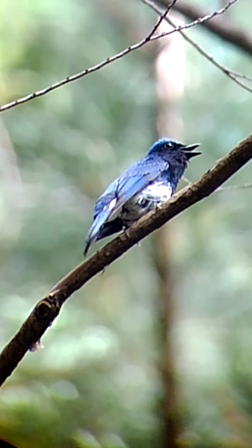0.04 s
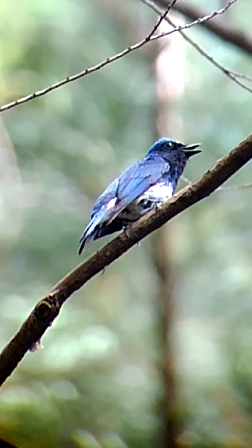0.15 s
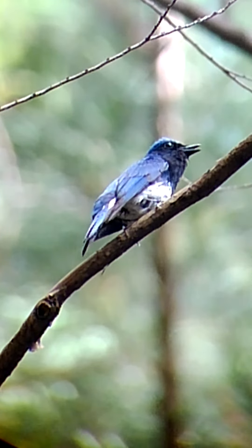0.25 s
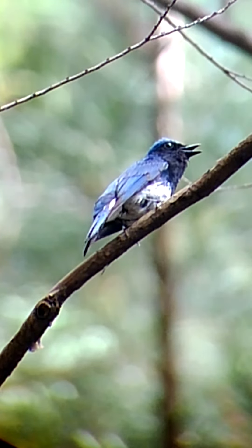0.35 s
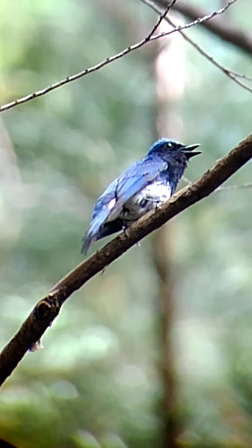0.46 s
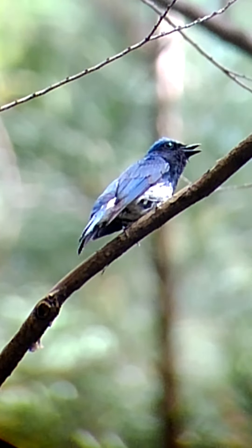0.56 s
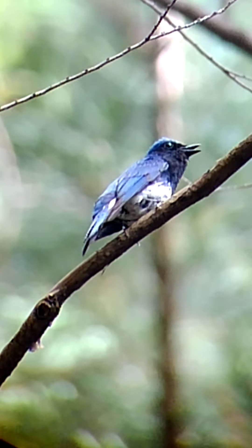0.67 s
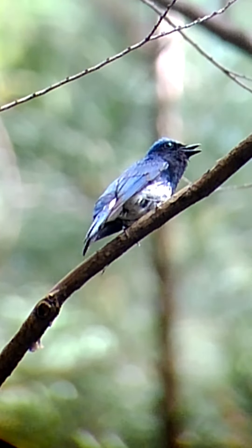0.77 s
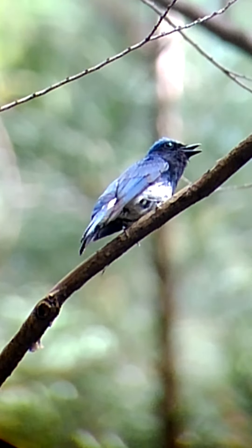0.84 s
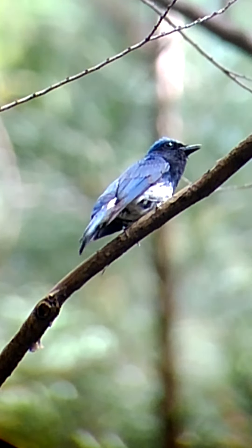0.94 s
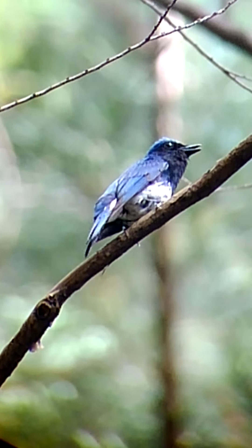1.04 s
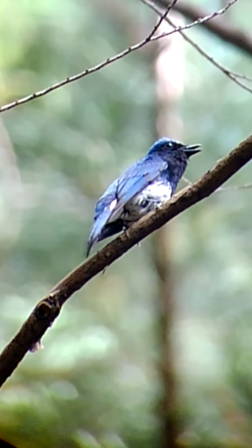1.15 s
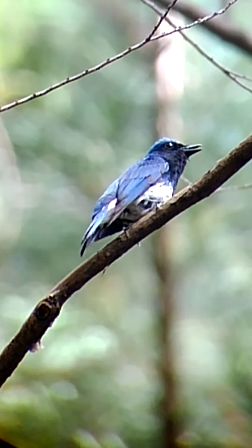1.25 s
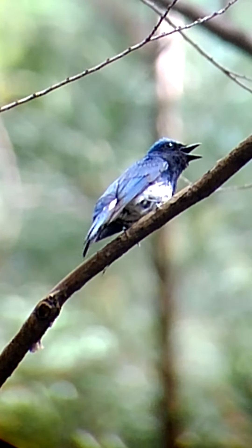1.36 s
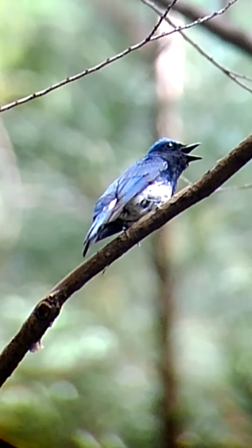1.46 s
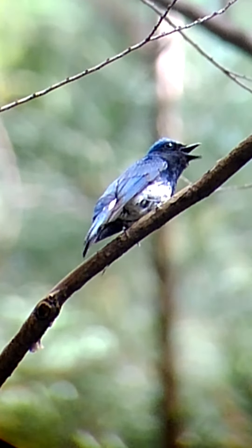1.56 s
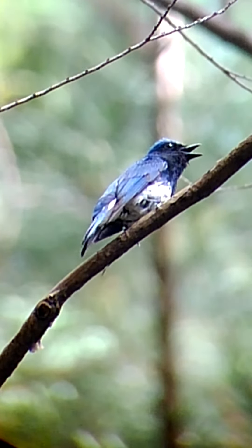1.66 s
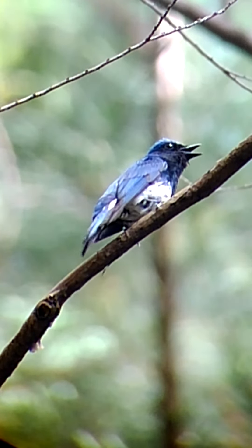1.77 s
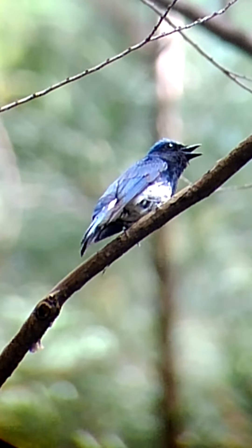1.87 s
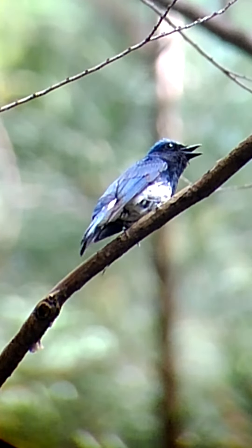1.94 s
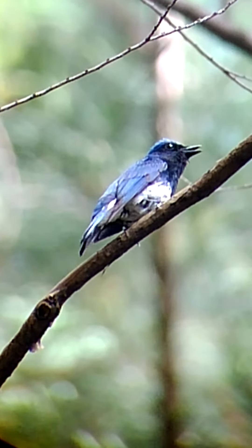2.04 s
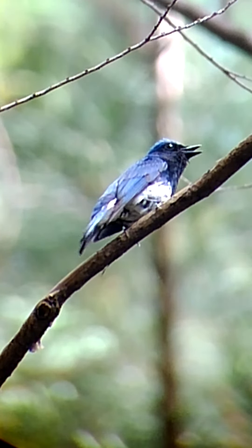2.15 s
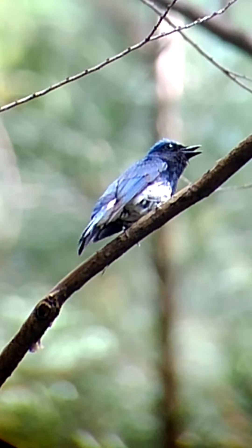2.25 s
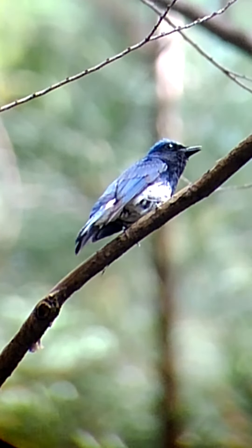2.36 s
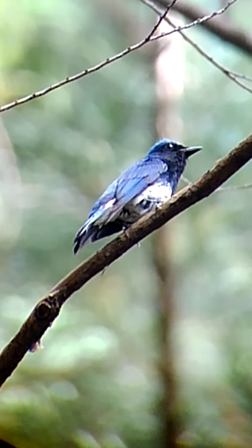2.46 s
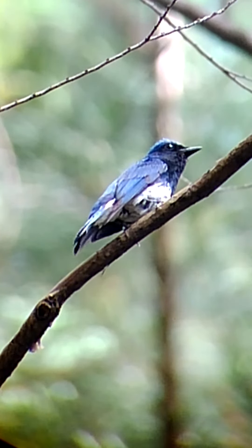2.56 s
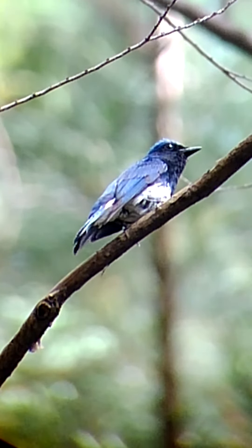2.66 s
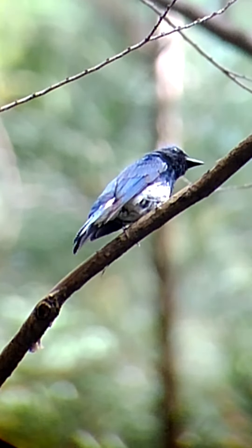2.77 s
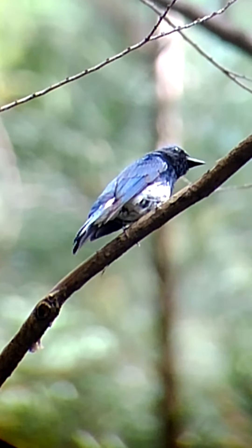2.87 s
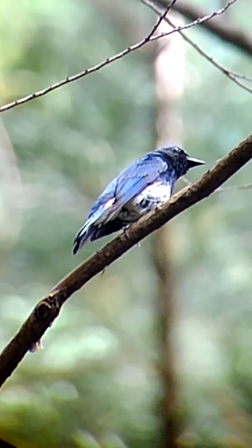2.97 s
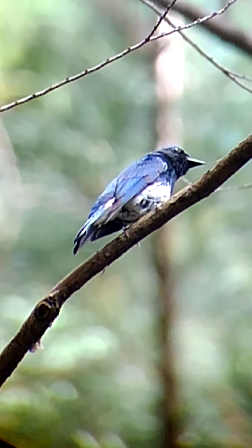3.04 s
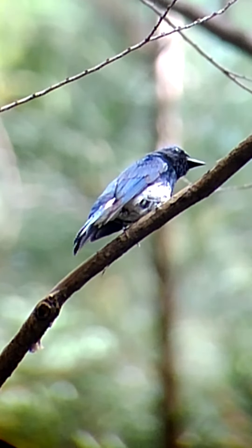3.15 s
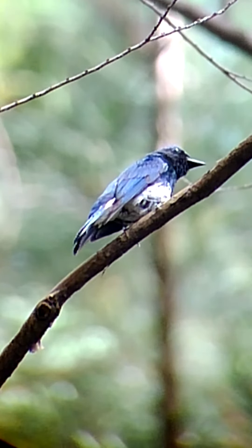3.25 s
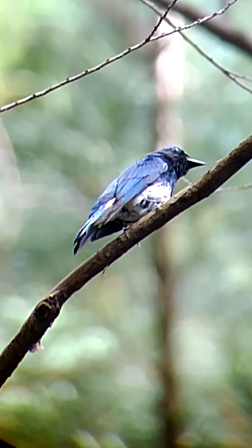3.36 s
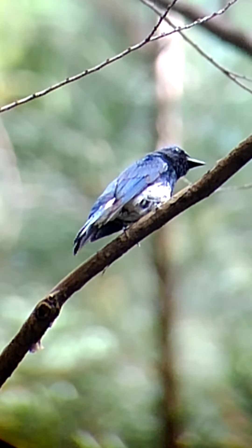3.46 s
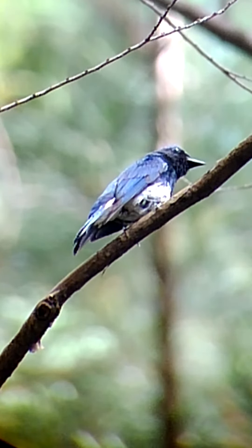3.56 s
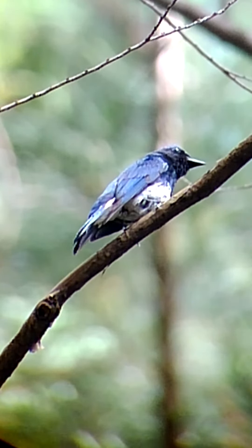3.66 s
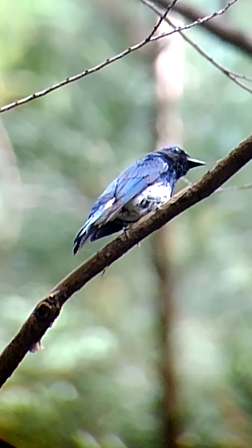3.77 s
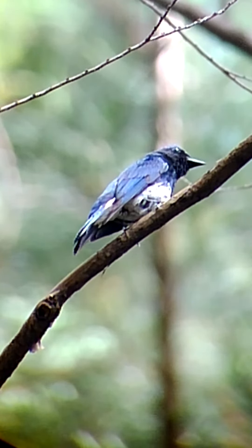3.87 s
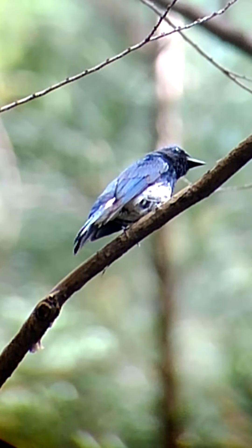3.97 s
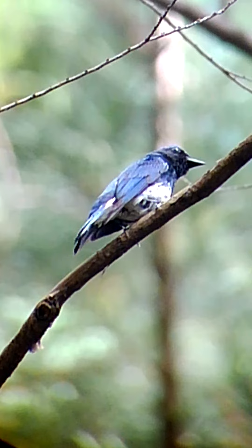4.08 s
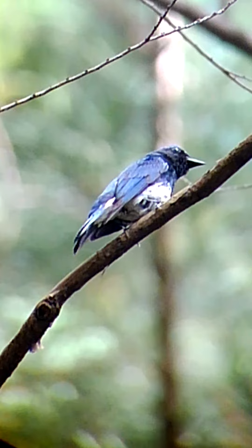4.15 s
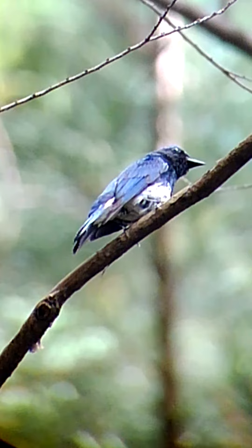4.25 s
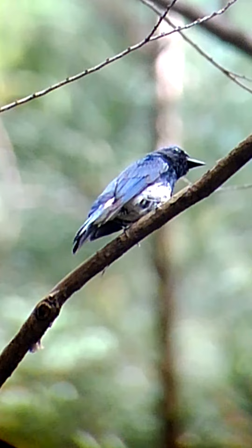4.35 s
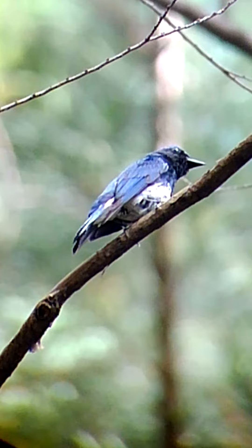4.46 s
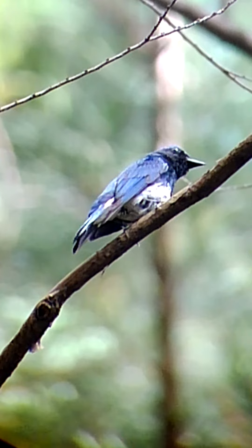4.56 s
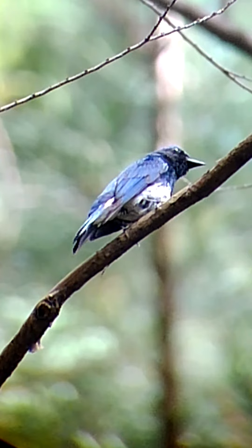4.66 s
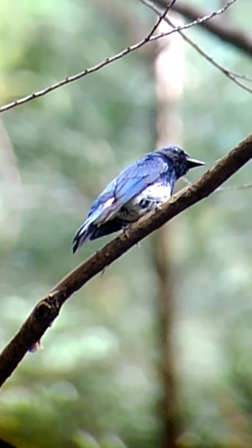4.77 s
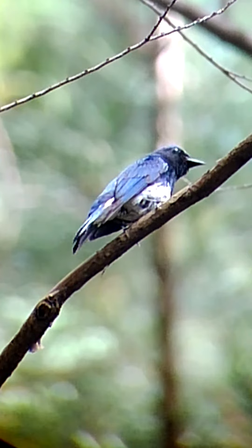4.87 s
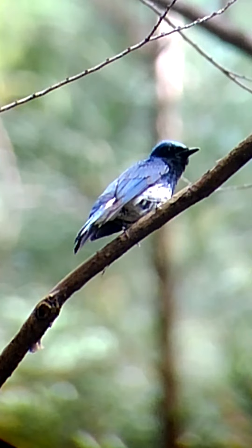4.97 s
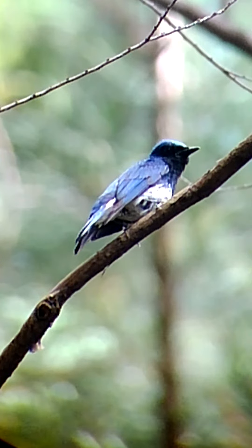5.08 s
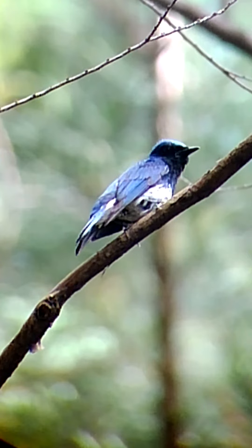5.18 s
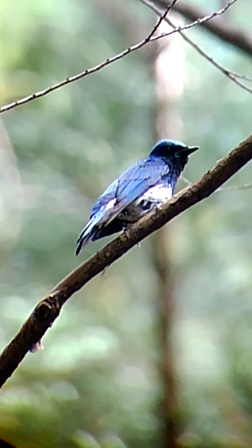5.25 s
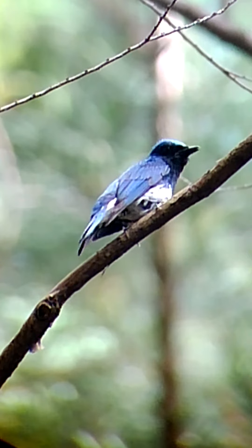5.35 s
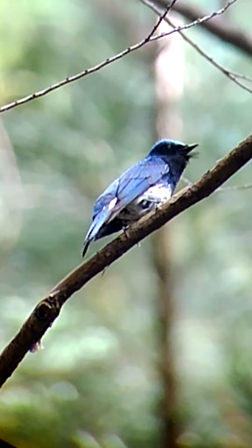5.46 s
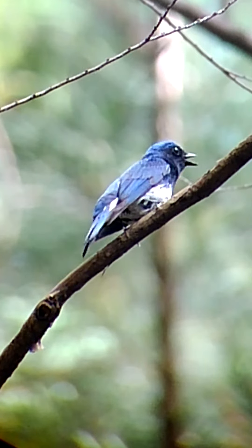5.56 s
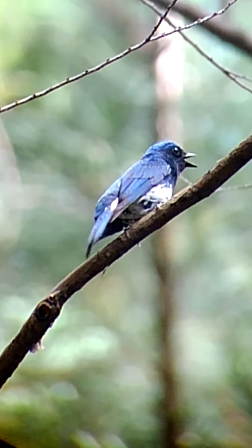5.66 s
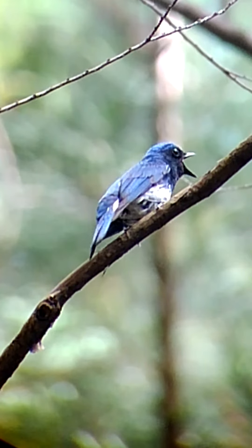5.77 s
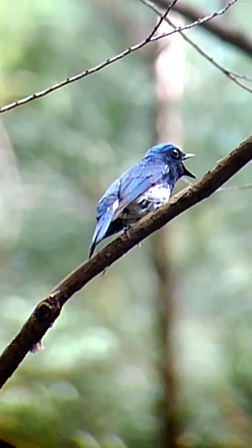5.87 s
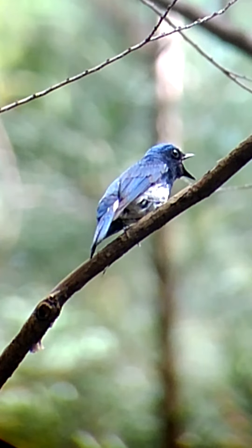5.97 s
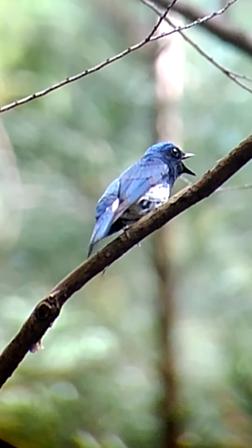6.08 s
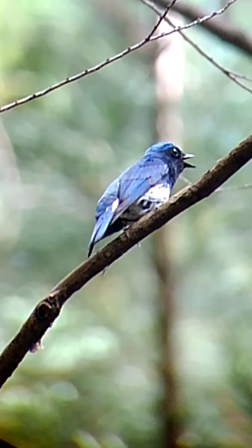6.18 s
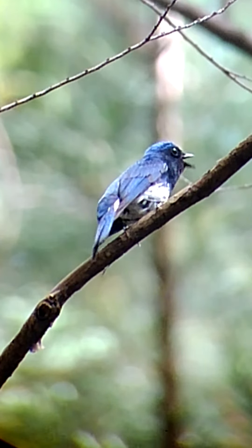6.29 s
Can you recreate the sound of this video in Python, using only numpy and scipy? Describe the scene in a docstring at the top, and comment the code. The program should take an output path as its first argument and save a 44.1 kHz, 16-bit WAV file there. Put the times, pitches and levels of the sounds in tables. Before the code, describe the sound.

A nearby songbird opens with a fluttering warbled note and three pure whistles that scoop upward, each echoing off the trees. A run of soft dry rasps follows and fades. During a long pause, faint far birds and tiny twig ticks show over low rumble and slight hiss. Then the near bird returns with quick chips and a higher whistle.

```python
"""Flycatcher in an echoing forest

A near bird sings slurred whistles, a run of dry rasps and, after a pause, a higher phrase.
Whistles are fluttering near-pure tones; rasps are uneven snaps and air puffs ringing throat and beak.
Echoes off trunks and a noise-built wash off foliage beat against the notes; far birds arrive mostly scattered.
Filtered noise makes a few twig ticks over a low rumble and faint hiss.
"""
import sys
import numpy as np
from scipy import signal
from scipy.fft import rfft, irfft
from scipy.io import wavfile
from scipy.ndimage import uniform_filter1d

SR = 44100
rng = np.random.default_rng(int(sys.argv[2]) if len(sys.argv) > 2 else 0)


def wrap_up_sound(samples):
    """Save the sound to the file named by the first command line argument, as 16-bit audio."""
    columns = np.atleast_2d(samples).T
    # keep every value between -1 and 1, then stretch to whole-number steps
    tamed = np.clip(columns, -1, 1)
    steps = np.round(tamed * 32767).astype(np.int16)
    wavfile.write(sys.argv[1], SR, steps)


N = 278712
T = np.arange(N) / SR


# The opening warbled note. Each row: start in seconds, length in seconds, start, middle and end pitch in Hz,
# level in dB.
WARBLE = [(0, 0.128, 3230, 3320, 3280, -43)]
# The near bird's short chips and flicks. Each row: start in seconds, length in seconds,
# start, middle and end pitch in Hz, level in dB.
CHIPS = [(1.425, .06, 6150, 6300, 6300, -65), (5.513, .015, 5325, 5170, 5145, -46.5),
         (5.53, .024, 3000, 4490, 3360, -45.5), (5.56, 0.026, 3770, 3653, 3664, -45),
         (5.747, 0.0073, 4930, 4840, 4690, -51.5), (6.012, 0.042, 4847, 4840, 4810, -48.5),
         (6.054, 0.011, 5670, 6170, 6090, -62), (6.063, 0.017, 8020, 7200, 7010, -62),
         (6.08, .016, 6860, 7010, 7140, -53.5), (6.155, 0.018, 3197, 4860, 5540, -48.5),
         (6.172, 0.043, 4500, 3860, 3363, -44), (6.308, .016, 4510, 3880, 2930, -53)]
# Echoes off the perch, nearby branches and trunks. Each row: delay in seconds, level in dB.
TRUNK_ECHOES = [(.0047, -9), (0.0129, -8), (.023, -13), (0.05, -17), (.072, -18)]
VIBRATO_HZ, VIBRATO_DEPTH_HZ = 31.33, 229  # rate; depth at time zero
VIBRATO_CREST_S, VIBRATO_FADE_S = 0.024, 0.17  # time of a crest; time constant of the narrowing


def flycatcher():
    """The near bird, heard directly, off single branches and trunks, and through the foliage."""
    # the warble narrows as the note goes on
    vibrato_depth_hz = VIBRATO_DEPTH_HZ * np.exp(-T / VIBRATO_FADE_S)
    vibrato_hz = vibrato_depth_hz * np.cos(2 * np.pi * VIBRATO_HZ * (T - VIBRATO_CREST_S))
    warble = whistle(arcs(WARBLE, attack_s=0.0013, release_s=0.026), waver=0.0022, bend_hz=vibrato_hz)
    chips = whistle(arcs(CHIPS, attack_s=0.0035, release_s=0.0021), waver=0.003,
                    slide_flutter_s=0.0022, most_flutter=0.031, second_db=9)
    tones = whistle(slurs(), waver=0.0013) + chips + warble
    buzz = rasps(pulse_hz=251.0, jitter=0.12, closing=0.48, width_hz=690, air_db=-6.5, scatter_db=4.5)
    direct = tones + buzz
    echoes = sum(undb(db) * np.pad(direct, (int(delay * SR), 0))[:N] for delay, db in TRUNK_ECHOES)
    # the foliage gets a little more of the rasps
    scattered = forest(tones + undb(2.0) * buzz, early_db=-7.5, early_t60=0.33, late_db=-7.5, late_t60=1.005)
    return direct + echoes + scattered


# The near bird's long rising slurs; the knee is where the scoop ends. Each row: start in seconds,
# length in seconds, scoop time in seconds, start, knee and top pitch in Hz,
# scoop, first swell and second swell level in dB.
SLURS = [(0.28, .235, .033, 2780, 3153, 3349, -43.5, -39.5, -41.5),
         (0.692, .212, .05, 2800, 3152, 3276, -44, -37.5, -41),
         (1.037, .2, .085, 2804, 3115, 3216, -42, -46.5, -41),
         (5.754, 0.24, 0.05, 3250, 4630, 4840, -40, -44, -42)]
TOP_AT, SAG_HZ = 0.78, 24.9  # share of the length where the pitch tops out; sag by the end
SWELL_S, SECOND_SWELL_AT = 0.022, 0.76  # knee to first crest in seconds; second crest as a share of the length
SLUR_START_DB, SLUR_KNEE_DB = -16, -7.5  # relative to the scoop
SLUR_DIP_DB, SLUR_END_DB = -7.5, -11.5  # relative to the second swell


def slurs():
    """Each slur scoops up fast, then climbs slowly through two swells; gives (times, pitch, dB) per note."""
    notes = []
    for start, length, knee_s, start_hz, knee_hz, top_hz, scoop_db, first_db, second_db in SLURS:
        t = T[:int(length * SR)]
        corners_s = [0, knee_s, TOP_AT * length, length]
        hz = np.interp(t, corners_s, [start_hz, knee_hz, top_hz, top_hz - SAG_HZ])
        hz = uniform_filter1d(hz, size=600, mode="nearest")
        first_s, second_s = knee_s + SWELL_S, SECOND_SWELL_AT * length
        scoop = [(0, scoop_db + SLUR_START_DB), (0.69 * knee_s, scoop_db), (knee_s, scoop_db + SLUR_KNEE_DB)]
        # the level slides into the dip, then leaps straight to the second crest
        swells = [(first_s, first_db), (second_s, second_db + SLUR_DIP_DB),
                  (second_s, second_db), (length, second_db + SLUR_END_DB)]
        notes.append((start + t, hz, np.interp(t, *np.transpose(scoop + swells))))
    return notes


def arcs(rows, attack_s, release_s, edge_db=-18):
    """Each note follows one smooth arc through three pitches, fading in and out; gives (times, pitch, dB)."""
    notes = []
    for start, length, start_hz, middle_hz, end_hz, db in rows:
        t = T[:int(length * SR)]
        arc = np.polyfit([0, 0.5, 1], [start_hz, middle_hz, end_hz], 2)
        hz = np.polyval(arc, t / length)
        opening = np.clip(np.minimum(t / attack_s, (length - t) / release_s), 0, 1)
        notes.append((start + t, hz, db + edge_db * (1 - opening)))
    return notes


# Overtones leave the beak more easily in the high treble.
# Each row: overtone frequency in Hz, level in dB relative to the fundamental (second_db lifts the second).
OVERTONES = [(6500, -58), (9700, -49), (11200, -28), (14200, -38.5)]


def whistle(notes, waver, bend_hz=0, second_db=4, slide_flutter_s=0.0013, most_flutter=0.025):
    """The syrinx glides through each note as an almost pure tone that flutters when the pitch slides fast."""
    pitch, gain, slide = np.zeros((3, N))
    for s, hz, db in notes:
        on = (T >= s[0]) & (T <= s[-1])
        # hold the pitch slightly past both ends, where the smoothed gain still sounds
        near = (T >= s[0] - 0.002) & (T <= s[-1] + 0.002)
        pitch[near] = np.interp(T[near], s, hz)
        gain[on] = undb(np.interp(T[on], s, db))
        slide[near] = np.abs(np.diff(np.log(pitch[near]), prepend=np.log(hz[0]))) * SR
    gain = uniform_filter1d(uniform_filter1d(gain, size=70), size=70)
    flutter = np.minimum(slide_flutter_s * slide, most_flutter) * walk(700)
    sung_hz = pitch * (1 + waver * walk(180) + flutter) + bend_hz
    phase = 2 * np.pi * np.cumsum(sung_hz) / SR

    def overtone(k):
        level = undb(np.interp(k * pitch, *np.transpose(OVERTONES)))
        return level * (k * pitch < SR / 2) * np.sin(k * phase)

    return np.sqrt(2) * gain * (np.sin(phase) + undb(second_db) * overtone(2) + overtone(3))


# The near bird's rasps. Each row: start in seconds, length in seconds, main resonance in Hz, level in dB.
RASPS = [(1.359, 0.032, 5090, -52.5), (1.484, .034, 5470, -50.5), (1.608, 0.031, 5210, -56),
         (1.733, .014, 5160, -64), (1.82, 0.03, 5030, -57), (1.944, .025, 4970, -63.5),
         (1.997, 0.02, 5120, -67), (2.042, .026, 4900, -64.5), (2.109, 0.01, 4950, -66),
         (2.232, 0.02, 4860, -58.5), (2.351, 0.013, 5040, -69)]
# Further throat and beak resonances of a rasp. Each row: centre in Hz, width of each filter pass in Hz,
# level in dB relative to the main resonance.
THROAT = [(2280, 440, -17.5), (3850, 490, -10), (7100, 2400, -55), (11870, 2600, -25), (14000, 1400, -42)]


def rasps(pulse_hz, jitter, closing, width_hz, air_db=-5, scatter_db=4.0):
    """The syrinx snaps in uneven pulses; each snap and its puff of air ring the throat and the open beak."""
    out = np.zeros(N)
    for start, length, hz, db in RASPS:
        t = T[:int(length * SR)]
        # one snap at each wrap of the cycle, then air leaks until the syrinx closes again
        cycle = np.cumsum(pulse_hz * (1 + jitter * walk(300)[:len(t)])) / SR % 1
        wraps = np.diff(cycle, prepend=1) < 0
        snaps = wraps * undb(scatter_db * walk(470)[:len(t)])
        puffs = undb(air_db) * rng.standard_normal(len(t)) * np.exp(-cycle / closing)
        swell = np.interp(t / length, [0, 0.5, 1], [0.55, 1, 0.3])
        drive = np.pad((snaps + puffs) * swell, (0, SR // 200))  # room to ring out
        resonances = [(hz, width_hz, 0)] + list(THROAT)
        voice = sum(undb(g) * resonate(resonate(drive, f, w), f, w) for f, w, g in resonances)
        add(out, start, undb(db) * unit(voice))
    return out


def forest(x, early_db, early_t60, late_db, late_t60):
    """Scattered sound: a quick wash from nearby foliage and a long tail from the trees beyond."""
    t = T[:2 * SR]
    build_up = 1 - np.exp(-(t / 0.017) ** 2)

    def wash(t60):
        return unit(rng.standard_normal(len(t)) * build_up * undb(-60 * t / t60))

    response = (undb(early_db) * wash(early_t60) + undb(late_db) * wash(late_t60)) / np.sqrt(len(t))
    return signal.fftconvolve(x, response)[:N]


# A second songbird far off. Each row: start in seconds, length in seconds,
# start, middle and end pitch in Hz, level in dB.
FAR_SONG = [(.18, .18, 3780, 3760, 3680, -68.5), (.32, 0.12, 4150, 4400, 4270, -76),
            (2.0, 0.14, 3494, 3610, 3590, -76), (2.33, 0.096, 3620, 3780, 3730, -67.5),
            (2.45, 0.056, 3740, 3540, 3515, -66.5), (2.525, .085, 4750, 4100, 3750, -70.5),
            (2.62, 0.047, 3570, 3500, 3540, -68.5), (2.9, 0.12, 3890, 5020, 4940, -66),
            (3.05, .11, 5300, 5790, 5720, -73.5), (3.335, .08, 5740, 6800, 8450, -75),
            (3.44, .06, 6200, 4900, 4300, -77), (3.525, 0.1, 3680, 3840, 3772, -69),
            (3.875, .12, 3756, 4840, 4750, -71.5), (4.2, 0.13, 4820, 6150, 6930, -79)]
# A distant low warbler. Each row: start in seconds, length in seconds, start, middle and end pitch in Hz,
# level in dB.
LOW_WARBLER = [(4.575, .055, 1870, 1720, 1553, -70), (4.685, .03, 2770, 2250, 1870, -68.5),
               (4.768, .032, 2203, 2450, 2615, -66), (4.8, 0.0492, 2550, 1900, 1960, -70),
               (4.858, .068, 2406, 1800, 1440, -71)]
# Very distant falling calls. Each row: start in seconds, length in seconds, start pitch in Hz, level in dB.
FAR_CALLS = [(0, 0.26, 1545, -71), (0.074, 0.23, 1337, -80), (0.788, 0.22, 1595, -76.5),
             (1.703, .21, 1569, -77.5), (2.545, 0.26, 1625, -80.5), (3.073, 0.19, 1397, -75.5),
             (3.275, 0.1, 1603, -75), (3.823, .22, 1330, -79.5), (4.632, 0.23, 1380, -78.5),
             (5.751, 0.14, 1338, -79.5)]
CALL_MIDDLE, CALL_END = 0.96, 0.92  # pitch of a falling call as shares of its start


def far_birds():
    """Distant singers: most of their sound arrives scattered."""
    song = whistle(arcs(FAR_SONG, attack_s=0.0068, release_s=0.02), waver=0.011,
                   slide_flutter_s=0.005, most_flutter=0.04)
    warbler = whistle(arcs(LOW_WARBLER, attack_s=0.0067, release_s=0.006), waver=0.03)
    falling = [(start, length, hz, hz * CALL_MIDDLE, hz * CALL_END, db) for start, length, hz, db in FAR_CALLS]
    calls = whistle(arcs(falling, attack_s=0.013, release_s=0.023), waver=0.02)
    voices = song + warbler + calls
    return voices + forest(voices, early_db=0.0, early_t60=0.78, late_db=-2.0, late_t60=2.3)


# Twig ticks and taps. Each row: start in seconds, ring in Hz, width of each filter pass in Hz,
# time for the noise burst to fall 60 dB in seconds, level in dB.
TICKS = [(.532, 5530, 8000, .006, -59), (0.937, 7070, 11240, 0.11, -66.5), (2.669, 13000, 6000, .0076, -70),
         (3.329, 520, 500, 0.052, -59.5), (3.389, 776, 697, 0.12, -64), (4.023, 3180, 3840, 0.0091, -52),
         (4.732, 2970, 1670, 0.0094, -47)]


def twigs():
    """Small dry ticks: a brief noise snap rings the wood; the level is that of the loudest 2 ms."""
    out, t = np.zeros(N), T[:SR // 10]
    for start, hz, width_hz, t60, db in TICKS:
        burst = rng.standard_normal(len(t)) * undb(-60 * t / t60)
        snap = resonate(resonate(burst, hz, width_hz), hz, width_hz)
        loudest = np.sqrt(uniform_filter1d(snap ** 2, size=88).max())
        add(out, start, undb(db) * snap / loudest)
    return out


# Colour of the forest background. Each row: frequency in Hz, relative density in dB per Hz.
AIR = [(20, 2), (60, 0.6), (130, -11.5), (300, -17.5), (800, -23), (1400, -23), (2800, -27), (4500, -30.5),
       (6800, -28.5), (8200, -34), (9700, -43), (12000, -39), (15500, -38)]
AIR_DB = -60.5  # rms level before the sway


def background(sway_db=0.19):
    """Low rumble and faint hiss: noise coloured in the spectrum, swaying a little in level."""
    hz, db = np.transpose(AIR)
    freqs = np.arange(N // 2 + 1) * SR / N
    colour = undb(np.interp(np.log(freqs + 1), np.log(hz), db))
    air = unit(irfft(rfft(rng.standard_normal(N)) * colour, N))
    return air * undb(AIR_DB + sway_db * walk(3.75))


def undb(db):
    """Decibels to gain."""
    return 10 ** (np.asarray(db) / 20)


def unit(x):
    """Scale to rms 1."""
    return x / np.sqrt(np.mean(x ** 2) + 1e-30)


def walk(rate):
    """Smooth random drift with a spread near 1, from random steps at a rate in Hz."""
    k = max(int(SR / rate), 2)
    steps = np.repeat(rng.standard_normal(N // k + 1), k)
    return 1.4 * uniform_filter1d(uniform_filter1d(steps, k), k)[:N]


def resonate(x, hz, width_hz):
    """A two-pole resonance with gain 1 at its centre."""
    return signal.lfilter(*signal.iirpeak(min(hz, SR / 2 - 1), hz / width_hz, SR), x)


def add(out, start, sound):
    """Mix a sound in at a time in seconds."""
    i = max(int(start * SR), 0)
    out[i:i + len(sound)] += sound[:max(N - i, 0)]


def scene():
    """The near bird in its forest, on one channel."""
    return (flycatcher() + far_birds() + twigs() + background())[None]


TOP_HZ = 15800


def record(dry):
    """The recorder cuts the top steeply."""
    # 0.1 dB ripple below the edge, 70 dB down above it
    return signal.sosfilt(signal.ellip(10, 0.1, 70, TOP_HZ, fs=SR, output="sos"), dry)


dry = scene()
out = record(dry)
wrap_up_sound(out)
```